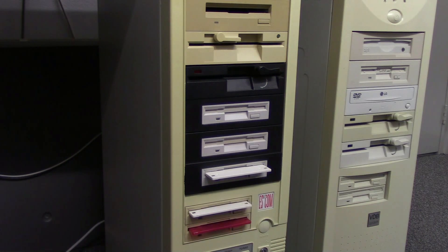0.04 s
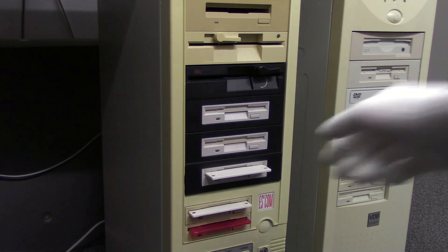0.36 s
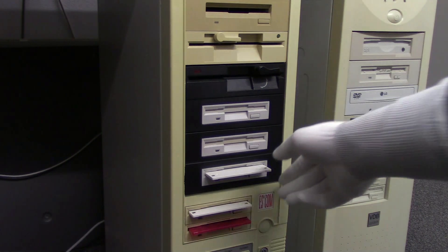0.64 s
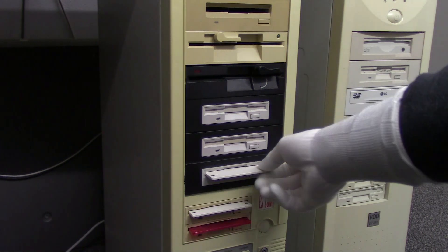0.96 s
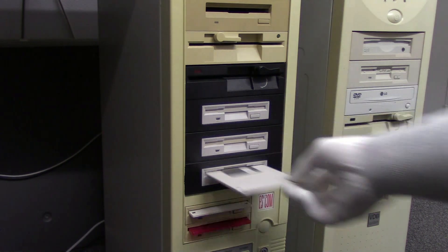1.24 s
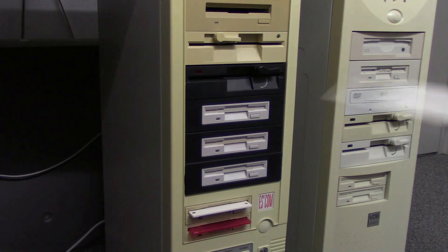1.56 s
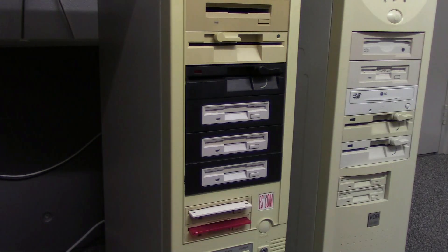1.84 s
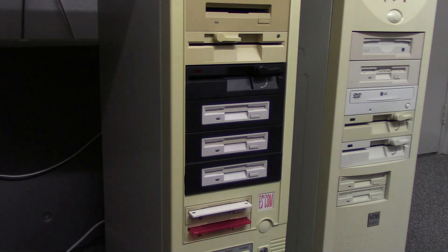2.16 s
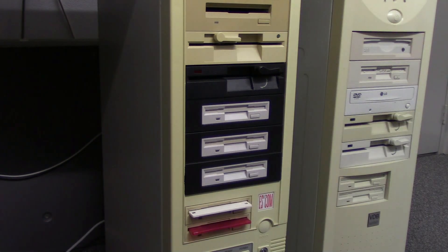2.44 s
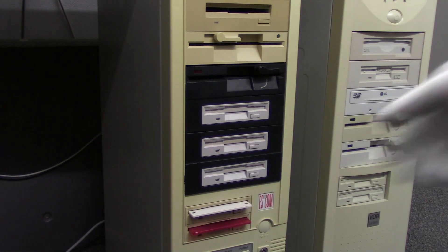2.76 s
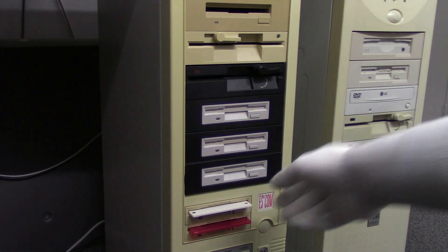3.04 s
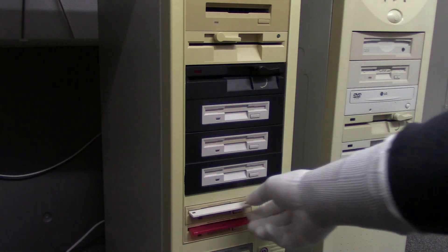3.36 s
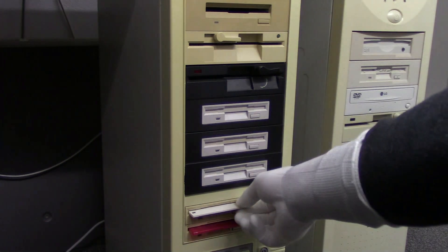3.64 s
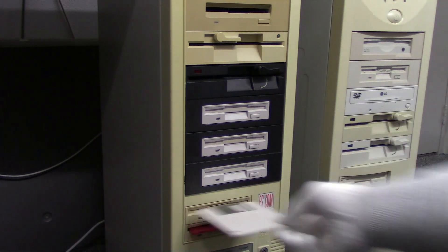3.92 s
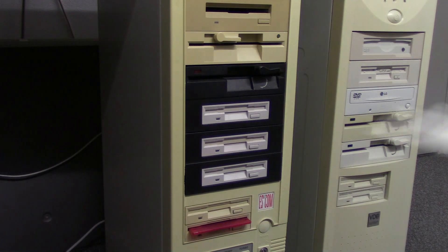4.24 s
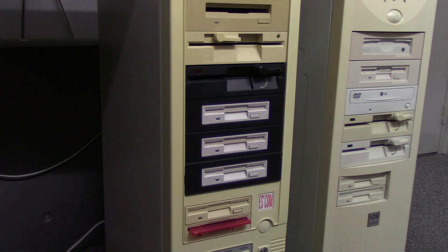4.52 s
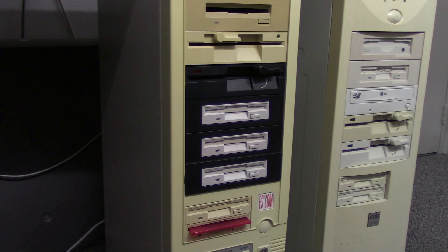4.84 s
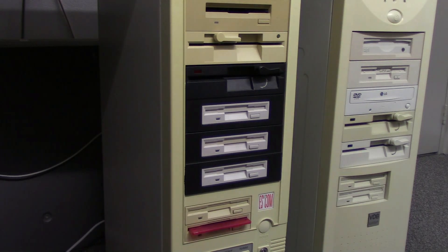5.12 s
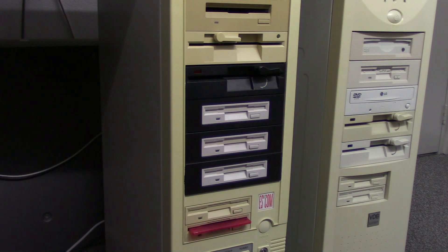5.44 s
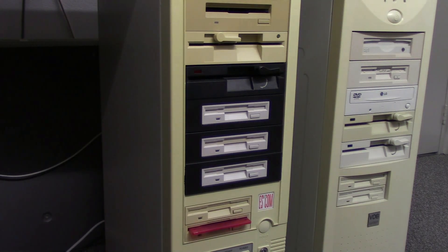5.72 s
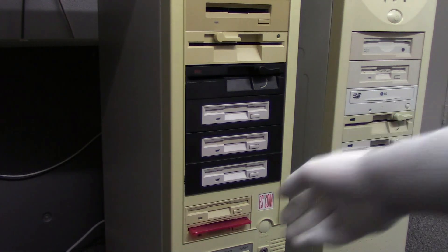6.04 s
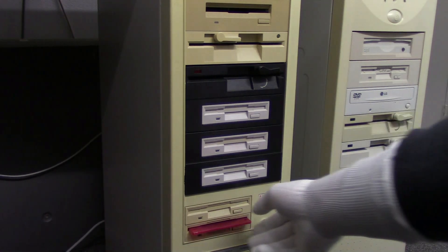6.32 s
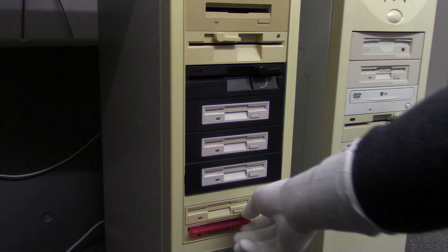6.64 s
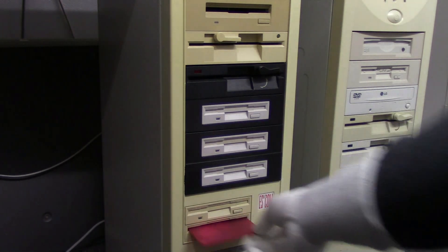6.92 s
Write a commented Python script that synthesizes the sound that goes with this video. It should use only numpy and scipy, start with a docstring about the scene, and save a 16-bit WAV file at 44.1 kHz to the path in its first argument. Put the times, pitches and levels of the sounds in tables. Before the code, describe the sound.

Three floppy disks are drawn from a computer tower one after another, heard up close in a small room. Each gives a brief, faintly squeaky plastic scrape, a few clicks and a bright shutter snap with a knock from the steel case. The first two are put down on a nearby table, clacking, thumping and sliding to rest. Fans and a high hard disk whine drone underneath throughout.

```python
"""Fans and hard disks hum in a small room. About a second in, a floppy disk catches in an old computer
tower, scrapes and squeaks along its slot and comes free: its shutter snaps shut with a brief ring and
the steel case knocks. At 2 s the disk is put down nearby, where it clatters, thumps the table and
slides to rest. A second disk snaps free at 4 s and joins it at 4.7 s. A third is pulled out just after
7 s, with the hum still running."""
import sys
import numpy as np
from scipy import signal
from scipy.fft import rfft, irfft, next_fast_len
from scipy.io import wavfile
from scipy.ndimage import uniform_filter1d

SR = 44100
rng = np.random.default_rng(int(sys.argv[2]) if len(sys.argv) > 2 else 0)


def generate_wav(sig):
    """Save sig (samples, or channels by samples) to the path in sys.argv[1] as 16-bit PCM at SR."""
    pcm = np.round(np.clip(np.atleast_2d(sig).T, -1, 1) * 32767).astype(np.int16)
    wavfile.write(sys.argv[1], SR, pcm)


N = 316638
T = np.arange(N) / SR
HIT_T = T[:SR // 2]  # time within one hit


# disks coming free (time [s], snap level [dB], snap ring [Hz], snap tilt [dB/octave],
# after-ring delay [s], after-ring level [dB], after-ring pitch [Hz],
# jolt level [dB], jolt centre [Hz], jolt width [octaves])
DISK_EXITS = [(1.3357, -14.5, 3980, -1, .0037, -24, 1400, -21.5, 450, 3.6),
              (3.99, -21, 8600, 0, .003, -25, 2250, -27, 202, 0.64),
              (7.118, -19, 7500, -1.5, .011, -29.5, 1510, -18.5, 300, 0.38)]
# body of the steel case with its drives (pitch [Hz], level [dB], t60 [s])
CASE_MODES = [(207, 3.5, 0.11), (318.6, -6.5, 0.25), (512, -10.5, 0.2), (568, 6, 0.06), (698, 5, 0.08),
              (733, 3.5, 0.078), (1170, -14, .17), (1320, -14, 0.22), (1520, -1.5, 0.14), (2304, -15, 0.19),
              (2740, -12, 0.1), (3560, -4, 0.13), (3930, -2, 0.098), (5050, -7, .13), (5516, -8, 0.17),
              (6000, -7, .13)]
def shutter_snaps():
    """A freed disk's shutter snaps, jolts the case and rings on lower a few milliseconds later."""
    snap_ring_db, after_ring_db, after_tilt_db = 8, 21, 0.5
    snaps, jolts = [], []
    for s, db, hz, tilt_db, delay, after_db, after_hz, jolt_db, jolt_hz, octaves in DISK_EXITS:
        snaps.append((s, db, hz, snap_ring_db, tilt_db))
        snaps.append((s + delay, after_db, after_hz, after_ring_db, after_tilt_db))
        jolts.append((s + 0.402 * delay, jolt_db, jolt_hz, octaves))  # between snap and after-ring
    return drive_clicks(snaps) + knocks(jolts, CASE_MODES, build_s=0.0023)


# snags on the way out (time [s], level [dB], ring [Hz], ring boost [dB], tilt [dB/octave])
GUIDE_CATCHES = [(0.776, -54, 6500, 6, -3), (1.269, -32, 2150, 22, -5), (1.322, -24, 4500, 14, -2),
                 (1.327, -28, 5530, 15, 0), (3.6283, -42.5, 7450, 11, -3), (3.8607, -35, 7660, 14, 2),
                 (3.8894, -32, 3060, 15, -4.5), (3.9782, -27.5, 3170, 15, -3), (6.725, -40, 9100, 16, -4),
                 (6.9824, -30, 8000, 11, 2), (7.0073, -31, 1900, 17, 0.5), (7.027, -31, 2970, 12, -3),
                 (7.1008, -22, 6350, 15.5, -2.5)]
def guide_catches():
    """A disk clicks as it catches on the guides and springs of its drive."""
    return drive_clicks(GUIDE_CATCHES)


# bright EQ of a snap (frequency [Hz], level [dB])
SNAP_EQ = [(100, -31), (250, -2), (700, -10), (1000, -2), (3000, -2), (5500, -2), (8500, -0.5), (12000, -4),
           (15500, -11.5)]
# slot resonances, for clicks and scrapes alike (centre [Hz], width [Hz], boost [dB])
SLOT_PEAKS = [(676, 60, 5), (1990, 120, -3), (2950, 160, 3), (3500, 150, -0.5), (5560, 320, 6),
              (6600, 320, 0.5), (7970, 220, 3.5)]
def drive_clicks(hits):
    """Hard contacts inside a drive ring the slot and rattle its small parts."""
    return cracks(hits, SNAP_EQ, SLOT_PEAKS, crack_t60=0.02, tick=2.8, rattle_db=-7.5, rattle_t60=0.088)


# pulls (start [s], length [s], level [dB], tilt [dB/octave], shutter drag before the exit [s])
DISK_PULLS = [(1.098, 0.23, -37.5, -0.5, 0.069), (3.776, 0.2, -39.5, .5, .038),
              (6.871, 0.236, -38.5, 2, 0.014)]
# mid-heavy EQ of the scrape (frequency [Hz], level [dB])
SCRAPE_EQ = [(120, -19), (400, -6.5), (800, 2), (1100, 2.5), (2800, 4), (4200, -1.5), (7000, -5),
             (10000, -13.5), (15500, -28.5)]
def slot_scrapes():
    """The hand speeds up, the shutter drags near the mouth of the slot, and the disk runs free."""
    speed_up_s, grip_s, coast_s = 0.13, 0.021, 0.032
    drag_db, fade_db_per_s = 6, 280
    strokes = []
    for start, length, db, tilt_db, shutter_s in DISK_PULLS:
        speed = np.sin(np.pi / 2 * np.clip((T - start) / speed_up_s, 0, 1)) ** 2
        drag = np.clip((T - start - length + shutter_s) / grip_s, 0, 1)
        free_s = np.maximum(T - start - length, 0)
        gain = speed * undb(db + drag_db * drag - fade_db_per_s * np.maximum(free_s - coast_s, 0))
        # dull while slow, brighter as the shutter drags, darkening fast once free
        tilt = tilt_db - 1.5 * (1 - speed) + drag - 120 * free_s
        strokes.append((gain, tilt))
    return rubbing(strokes, SCRAPE_EQ, SLOT_PEAKS, slips_per_s=12000, spread_db=-2.5, judder_db=2.2)


# squeaks in the slot and on the pile (start [s], length [s], pitch [Hz], level [dB])
SHELL_SQUEAKS = [(1.1, 0.16, 702, -44), (1.175, 0.072, 1328, -45), (1.245, 0.055, 1700, -43),
                 (2.159, 0.062, 2035, -32.5), (2.213, 0.084, 1728, -47), (3.87, 0.084, 3130, -42),
                 (3.955, .035, 3380, -39), (6.918, 0.065, 851, -43), (6.97, 0.039, 2210, -46)]
def shell_squeaks():
    """Stick-slip locks briefly on to one mode of a disk's shell, rough and never quite steady."""
    out = np.zeros(N)
    for start, length, hz, db in SHELL_SQUEAKS:
        arch = np.sqrt(np.maximum(0, 1 - (2 * (T - start) / length - 1) ** 2))
        out += undb(db) * arch * narrow_noise(hz, hz / 7) / np.sqrt(2)
    return out


# disks landing and shifting (time [s], clack level [dB], tilt [dB/octave], thump level [dB])
DISK_LANDINGS = [(1.773, -52, 2, -70), (2.0331, -21, -0.4, -43), (2.0589, -27, -0.5, -43),
                 (2.0946, -26, -2, -32.5), (2.2646, -38.5, -0.5, -58), (2.291, -40, -8, -52),
                 (2.56, -50, -2, -44), (2.6189, -36, -14, -39), (4.7058, -26, -2, -52),
                 (4.726, -34, 1.5, -58), (4.7526, -29, -2, -34), (4.8628, -33, -3.5, -48),
                 (5.251, -37.5, -2, -40.5), (5.525, -47.5, 0.5, -70), (5.618, -48, -.5, -70)]
# EQ of the plastic clack (frequency [Hz], level [dB])
CLACK_EQ = [(100, -23), (400, -3.5), (1100, -4), (3000, -1.5), (4500, -4), (5700, -3.5), (7200, -11.5),
            (11000, -14), (15500, -31)]
# hollow shell resonances, for clacks and slides alike (centre [Hz], width [Hz], boost [dB])
SHELL_PEAKS = [(1090, 32, 4.6), (1360, 84, 3.2), (1680, 65, 2.7), (2100, 36, 0.98), (2500, 180, 1.4),
               (5550, 160, 2.6)]
# body of the table (pitch [Hz], level [dB], t60 [s])
TABLE_MODES = [(231, 4, 0.12), (320, -3, 0.11), (514, -38, 0.12), (677, 13, 0.021)]
def pile_landings():
    """Every landing clacks the same hollow shell and thumps the same table."""
    ring_hz, ring_db = 2750, 9.5
    thump_hz, thump_octaves = 450, 0.82
    clacks = [(s, db, ring_hz, ring_db, tilt_db) for s, db, tilt_db, _ in DISK_LANDINGS]
    thumps = [(s, db, thump_hz, thump_octaves) for s, _, _, db in DISK_LANDINGS]
    shell = cracks(clacks, CLACK_EQ, SHELL_PEAKS,
                   crack_t60=0.013, tick=2.45, rattle_db=-8.5, rattle_t60=0.069)
    return shell + knocks(thumps, TABLE_MODES, build_s=0.00073)


# shoves over the pile (start [s], length [s], peak level [dB], tilt [dB/octave])
DISK_SHOVES = [(2.098, .11, -35, -1), (2.21, 0.052, -31.5, -1), (2.621, 0.026, -53.5, -10),
               (4.772, 0.084, -41.5, -1.5), (4.863, 0.052, -36.5, .5), (4.946, .16, -53.5, 4),
               (5.158, 0.041, -43.5, -3.5), (5.253, 0.046, -49, 4)]
# EQ of plastic sliding on the pile (frequency [Hz], level [dB])
SLIDE_EQ = [(120, -25), (500, -7), (900, -4.5), (1400, 0), (2300, 0), (3200, -1.5), (4500, -8.5),
            (5700, -10.5), (8000, -17.5), (15500, -34.5)]
def pile_slides():
    """A shoved disk grips, presses harder as it rubs over the pile, and stops short."""
    attack_s, swell_db_per_s, stop_db_per_s = 0.008, 38, 520
    strokes = []
    for start, length, db, tilt_db in DISK_SHOVES:
        attack = np.clip((T - start) / attack_s, 0, 1)
        past_end_s = T - start - length
        drop_db = np.maximum(-swell_db_per_s * past_end_s, stop_db_per_s * past_end_s)
        strokes.append((attack * undb(db - drop_db), tilt_db))
    return rubbing(strokes, SLIDE_EQ, SHELL_PEAKS, slips_per_s=9000, spread_db=1, judder_db=1)


def cracks(hits, eq, peaks, crack_t60, tick, rattle_db, rattle_t60):
    """Each contact is a tick and a dense, ringing crack; small plastic and metal parts rattle on."""
    out = np.zeros(N + len(HIT_T))
    for s, db, ring_hz, ring_db, tilt_db in hits:
        burst, rattle = rng.standard_normal((2, len(HIT_T)))
        burst[0] = -tick  # one-sample transient
        ring = (ring_hz, 0.4 * ring_hz, ring_db)
        crack = colour(burst * fade(crack_t60), eq, [*peaks, ring], tilt_db)
        crack += undb(rattle_db) * colour(rattle * fade(rattle_t60), eq, peaks, tilt_db)
        crack /= np.sqrt(np.sum(crack ** 2) / (0.005 * SR))  # level as if packed into 5 ms
        start = int(s * SR)
        out[start:start + len(HIT_T)] += undb(db) * crack
    return out[:N]


def knocks(hits, modes, build_s):
    """Blows ring the modes of a large body; the place and hardness of each decide which modes answer."""
    longest_t60 = 0.16  # screwed joints keep every panel from ringing long
    attack = 1 - np.exp(-HIT_T / build_s)
    out = np.zeros(N + len(HIT_T))
    for s, db, centre_hz, octaves in hits:
        start = int(s * SR)
        for hz, mode_db, t60 in modes:
            gain = undb(db + mode_db) * np.exp(-0.5 * (np.log2(hz / centre_hz) / octaves) ** 2)
            ring = fade(min(t60, longest_t60)) * np.sin(2 * np.pi * (hz * HIT_T + rng.random()))
            out[start:start + len(HIT_T)] += gain * attack * ring
    return out[:N]


def rubbing(strokes, eq, peaks, slips_per_s, spread_db, judder_db):
    """Dense micro-slips of textured plastic ring the resonances; the grip comes and goes."""
    slips = (rng.random(N) < slips_per_s / SR) * rng.choice([-1, 1], N)
    slips = unit(slips * undb(spread_db * rng.standard_normal(N)))
    slips *= undb(judder_db * wander(130))
    dull, plain, bright = (unit(colour(slips, eq, peaks, tilt)) for tilt in (-4, 0, 2))
    out = np.zeros(N)
    for gain, tilt in strokes:  # tilt crossfades between the three textures
        to_dull, to_bright = np.clip(-tilt / 4, 0, 1), np.clip(tilt / 2, 0, 1)
        out += gain * (plain + to_dull * (dull - plain) + to_bright * (bright - plain))
    return out


# airy bed of the fans (frequency [Hz], noise density [dB per Hz])
FAN_AIR = [(20, -101), (70, -99.5), (120, -82.5), (200, -70), (320, -71), (390, -81), (800, -85),
           (1300, -89), (2100, -95), (3500, -96), (4800, -102), (10000, -109), (14500, -117), (16000, -123)]
# resonances of the running machines (centre [Hz], width [Hz], boost [dB])
HUM_PEAKS = [(459, 24.7, 10.5), (496, 63, 10.5), (603.2, 30, 11), (974, 8.3, -5), (2640, 770, 6),
             (8220, 840, 5.5), (10960, 1300, 3.5)]
# fan blade and spindle tones (pitch [Hz], rms level [dB])
ROTOR_TONES = [(199, -57), (409, -73), (490, -61.5), (527, -60.5), (598, -65.5), (937, -67.5), (1281, -71),
               (1620, -72.5), (2740, -73), (2772, -68), (2805, -66.5), (2885, -72.5), (3004, -77),
               (3079, -71.5), (3661, -73.5), (4183, -75), (8393, -83)]
def machine_hum(waver_hz=2, flutter_db=3):
    """Air rushes through the cases; blade and spindle tones and one whine stand over it."""
    out = colour(rng.standard_normal(N), FAN_AIR, HUM_PEAKS) * np.sqrt(SR / 2)
    for hz, db in ROTOR_TONES:
        cycles = np.cumsum(hz + waver_hz * wander(14)) / SR + rng.random()
        out += np.sqrt(2) * undb(db + flutter_db * wander(16)) * np.sin(2 * np.pi * cycles)
    return out + hard_disk_whine()


def hard_disk_whine(hz=2576, level_db=-59.5, swell_db=3, period_s=10, crest_s=0.6):
    """A hard disk's throbbing whine slowly swells and sinks."""
    whine = 0.79 * np.sin(2 * np.pi * hz * T) + 0.47 * narrow_noise(hz, 42)
    swell = np.cos(2 * np.pi * (T - crest_s) / period_s)
    return undb(level_db + swell_db * swell) * whine


def room(x, wet_db, side_eq, t60_low=0.27, t60_high=0.19, predelay_s=0.00092):
    """A short tail whose treble dies first; reflections from the side walls add stereo width."""
    noise = rng.standard_normal(len(HIT_T))
    low = signal.sosfilt(signal.butter(1, 3500, fs=SR, output="sos"), noise)
    onset = np.clip(HIT_T / predelay_s - 1, 0, 1)
    tail = (low * fade(t60_low) + (noise - low) * fade(t60_high)) * onset
    walls = rng.standard_normal(len(HIT_T)) * fade(0.14) * (HIT_T > 0.002)
    return stereo(x + undb(wet_db) * reverberate(x, tail), colour(reverberate(x, walls), side_eq))


def reverberate(x, response):
    """Convolve with an impulse response scaled to unit energy."""
    return signal.fftconvolve(x, response / np.sqrt(np.sum(response ** 2)))[:N]


def low_cut(x, edge_hz=120):
    """Small panels and shells radiate almost no deep bass."""
    return signal.sosfilt(signal.butter(2, edge_hz, "high", fs=SR, output="sos"), x)


def colour(x, eq, peaks=(), tilt_db=0):
    """Causal EQ: a smooth curve, resonant peaks and a tilt per octave about 3 kHz."""
    size = 2 * next_fast_len(len(x) // 2 + 2048)
    hz = np.arange(size // 2 + 1) * SR / size
    eq_hz, eq_db = np.transpose(eq)
    db = np.interp(np.log(hz + 1), np.log(eq_hz), eq_db)
    db += sum(boost / (1 + (2 * (hz - centre) / width) ** 2) for centre, width, boost in peaks)
    db += tilt_db * np.log2(np.maximum(hz, 500) / 3000)
    # minimum phase keeps attacks sharp
    cepstrum = irfft(np.log(undb(db)))
    cepstrum[1:size // 2] *= 2
    cepstrum[size // 2 + 1:] = 0
    return irfft(rfft(x, size) * np.exp(rfft(cepstrum)))[:len(x)]


def narrow_noise(hz, rate_hz):
    """A tone whose level and phase wander at the given rate."""
    phase = 2 * np.pi * hz * T
    return wander(rate_hz) * np.sin(phase) + wander(rate_hz) * np.cos(phase)


def wander(rate_hz):
    """Smooth random modulation with a spread near 1."""
    hold = int(SR / rate_hz)
    steps = np.repeat(rng.standard_normal(N // hold + 1), hold)
    return np.sqrt(2) * uniform_filter1d(uniform_filter1d(steps, hold), hold)[:N]


def fade(t60):
    """Exponential decay envelope of one hit."""
    return np.exp(-np.log(1000) * HIT_T / t60)


def undb(db):
    """Gain of a level in dB."""
    return 10 ** (np.asarray(db) / 20)


def unit(x):
    """Scale to rms 1."""
    return x / np.sqrt(np.mean(x ** 2))


def stereo(mid, side):
    """Left and right from mid and side."""
    return np.array([mid + side, mid - side])


# stereo width of the drives (frequency [Hz], side relative to mid [dB])
DRIVE_WIDTH = [(150, -46), (700, -44), (2500, -21), (7000, -18), (14000, -26)]
# stereo width of the hum (frequency [Hz], side relative to mid [dB])
HUM_WIDTH = [(60, -3), (110, -14), (200, -23.5), (380, -18.5), (700, -14.5), (1290, -9), (2380, -17.5),
             (4400, -10), (8120, -12.5), (15000, -15)]
def scene():
    """The drives in front, the pile a little to the right, the hum all round."""
    drives = low_cut(guide_catches() + shutter_snaps() + slot_scrapes() + shell_squeaks())
    pile = low_cut(pile_landings() + pile_slides())
    drives = room(drives, wet_db=-10, side_eq=DRIVE_WIDTH)
    pile = room(pile, wet_db=-9, side_eq=[(150, -42), (3000, -15)])
    pan_right = undb([[-0.8], [0.8]])
    hum = stereo(machine_hum(), colour(machine_hum(), HUM_WIDTH))
    return drives + pan_right * pile + hum


def record(dry, top_hz=15900):
    """A steep low-pass cuts the top of the treble."""
    return signal.sosfilt(signal.ellip(10, 0.2, 70, top_hz, fs=SR, output="sos"), dry)


dry = scene()
out = record(dry)
generate_wav(out)
```